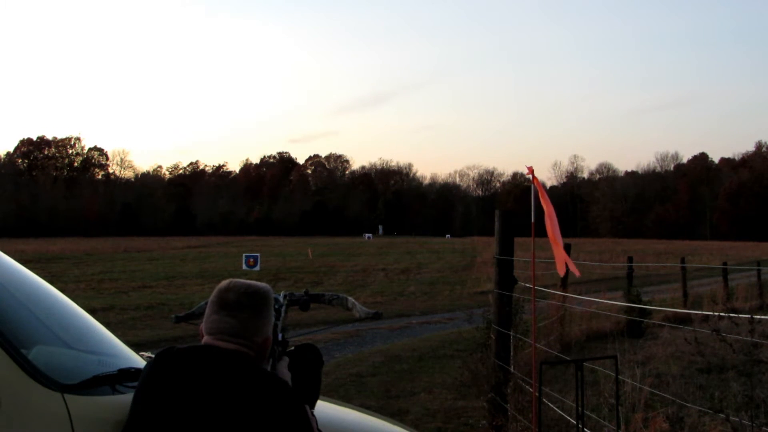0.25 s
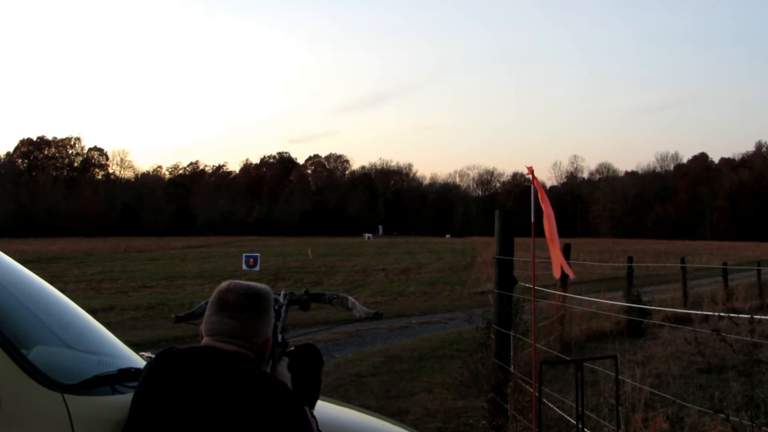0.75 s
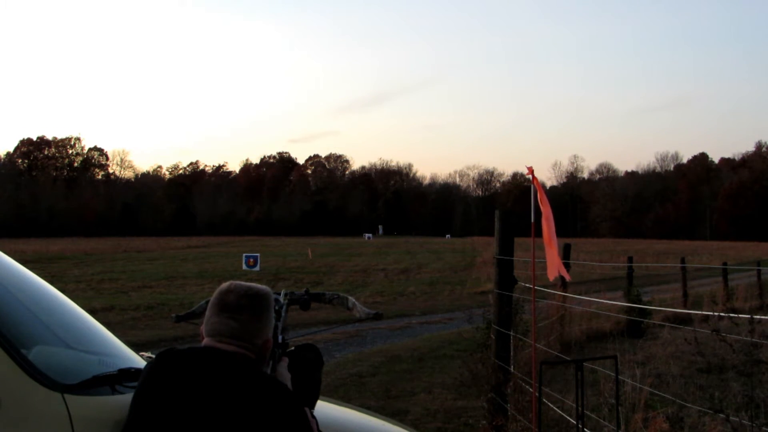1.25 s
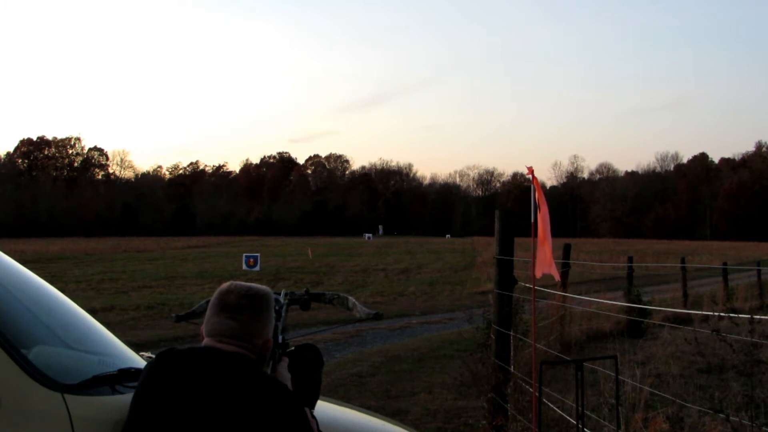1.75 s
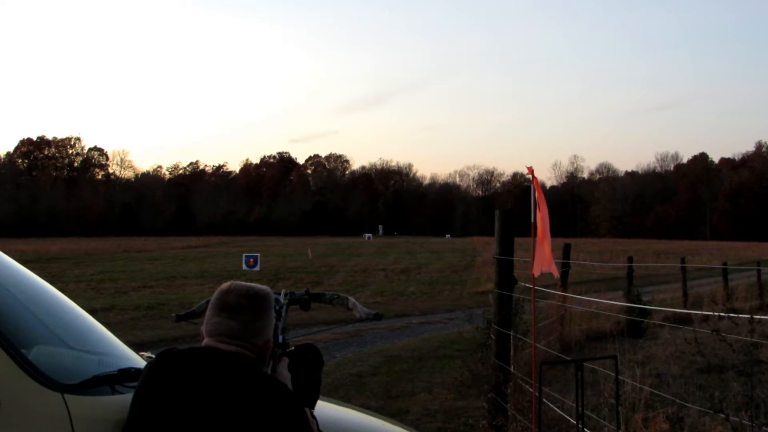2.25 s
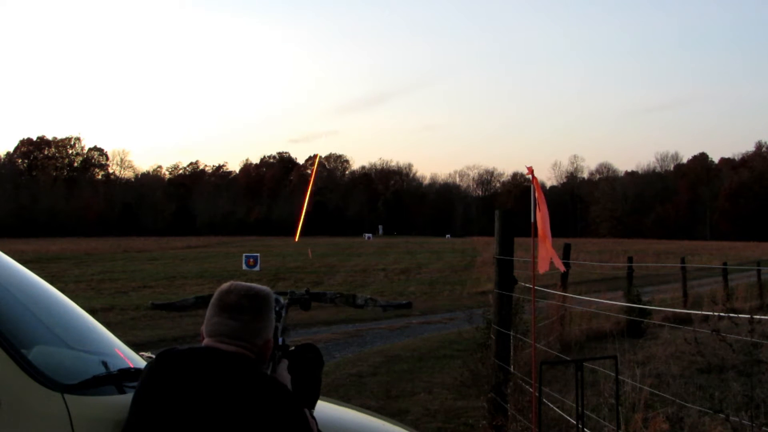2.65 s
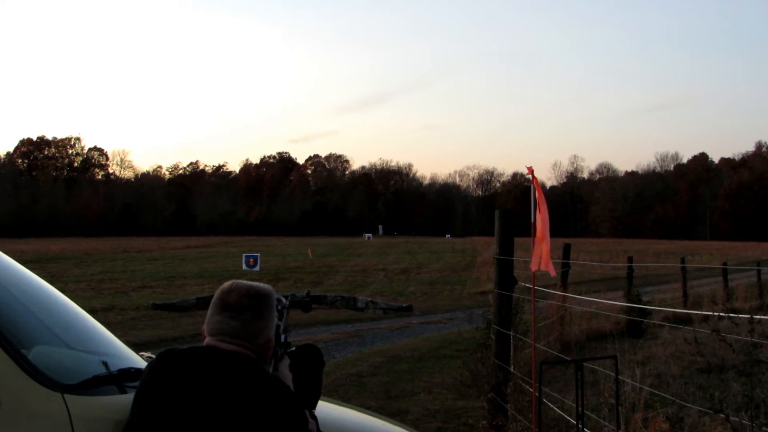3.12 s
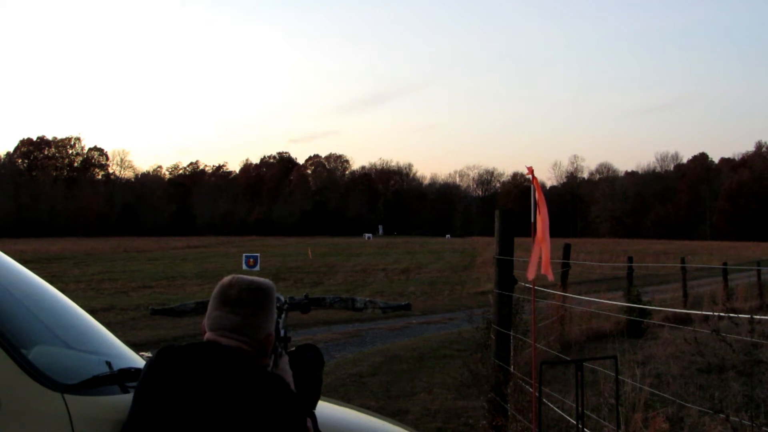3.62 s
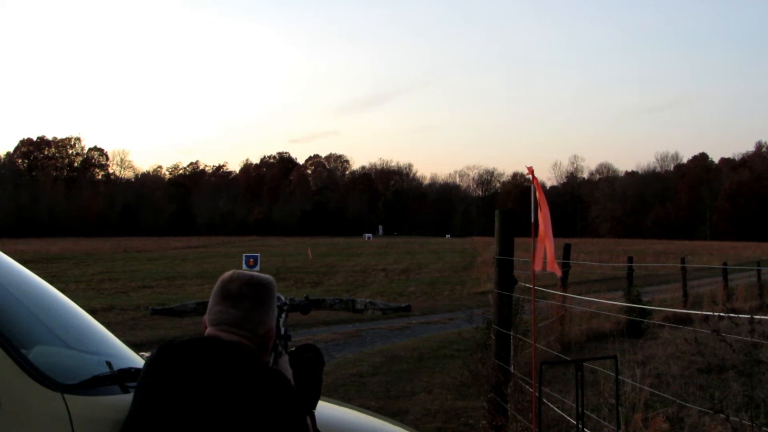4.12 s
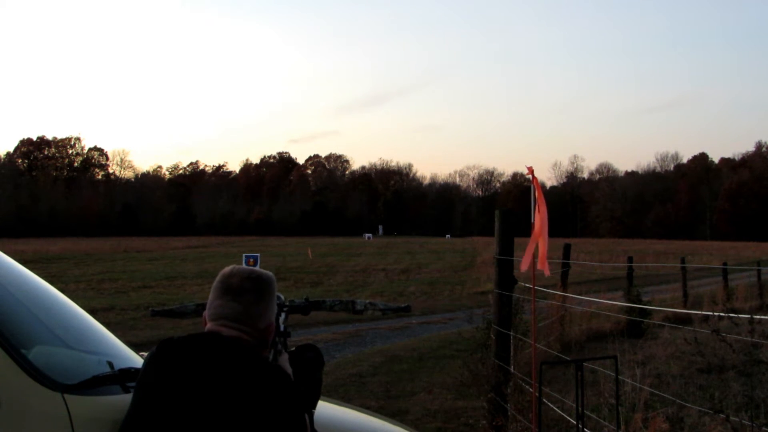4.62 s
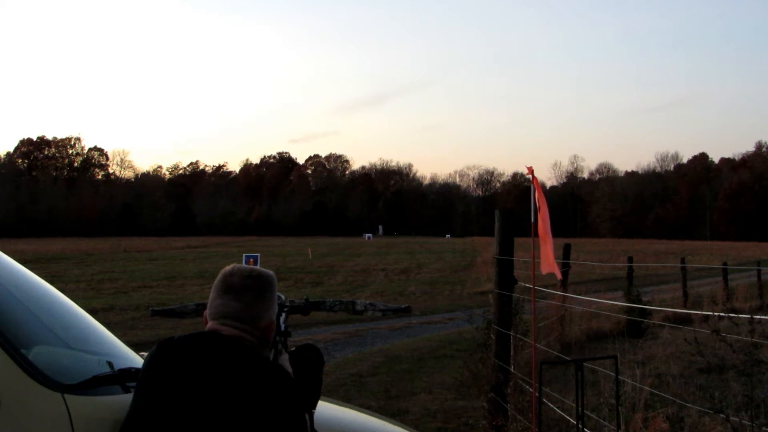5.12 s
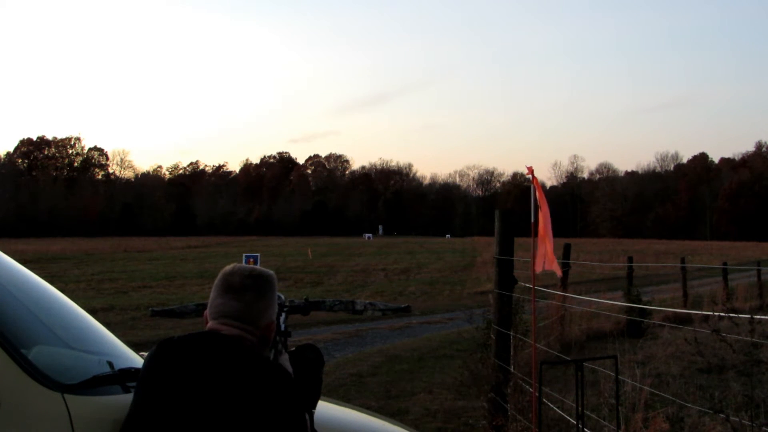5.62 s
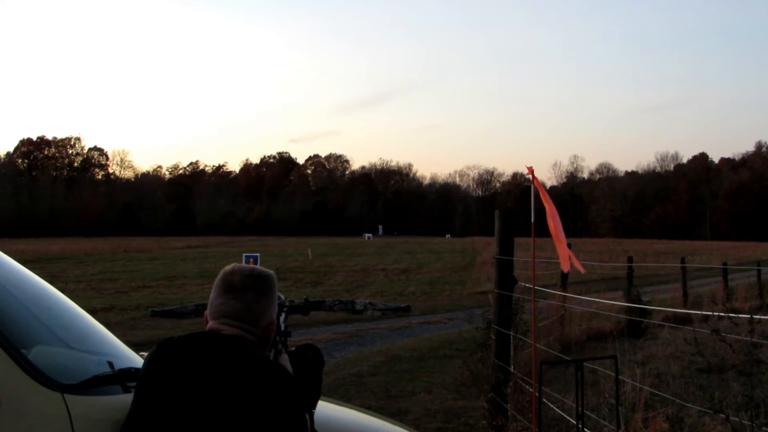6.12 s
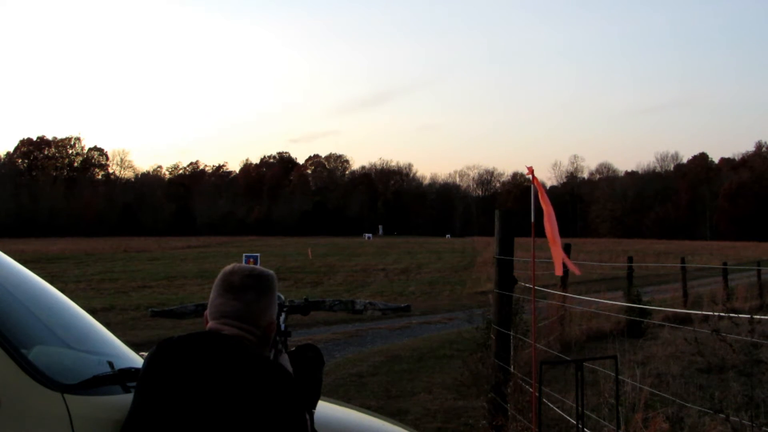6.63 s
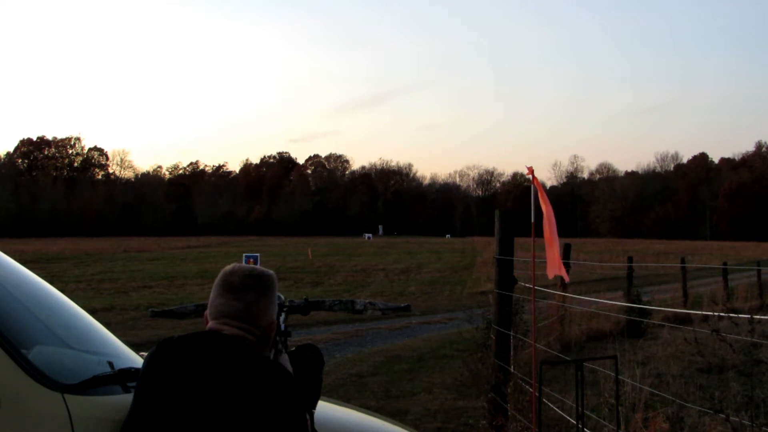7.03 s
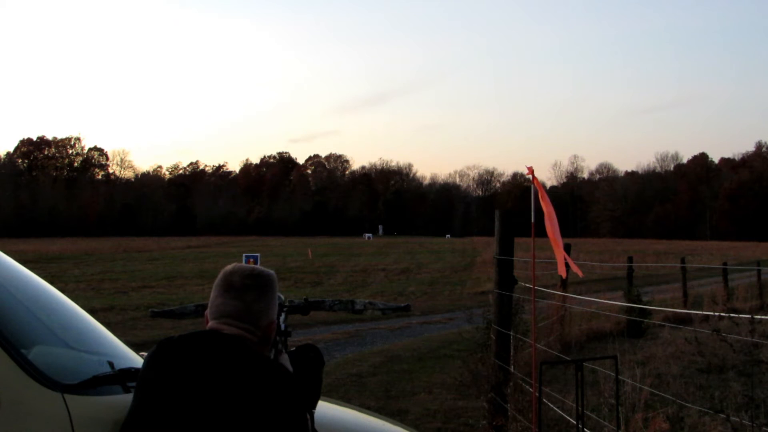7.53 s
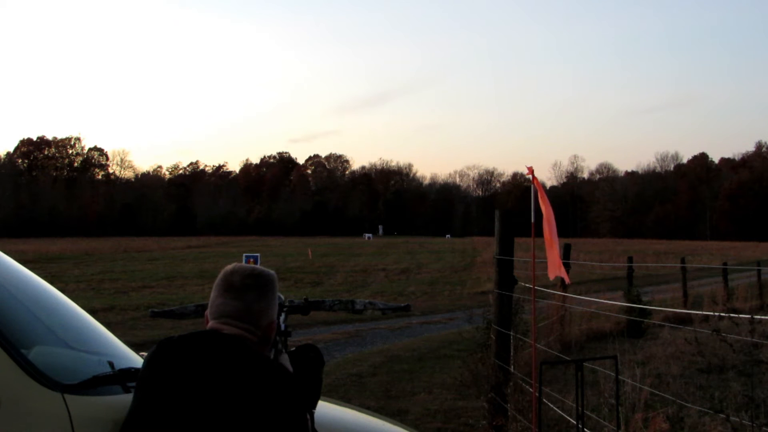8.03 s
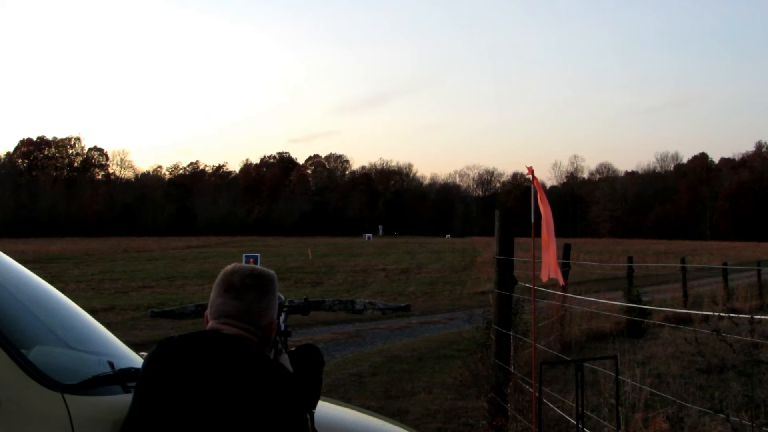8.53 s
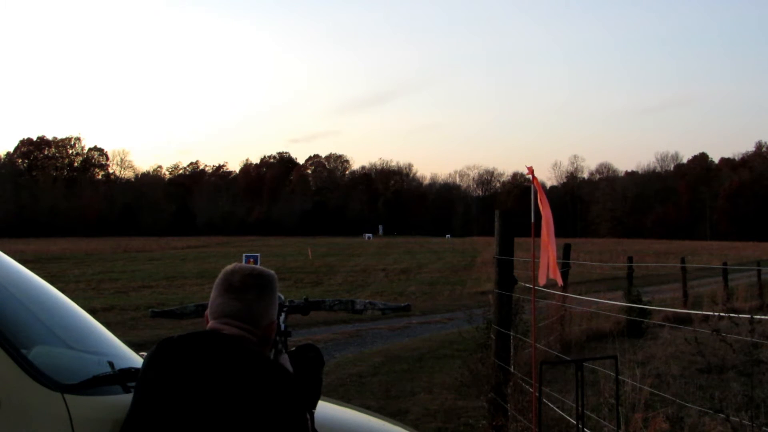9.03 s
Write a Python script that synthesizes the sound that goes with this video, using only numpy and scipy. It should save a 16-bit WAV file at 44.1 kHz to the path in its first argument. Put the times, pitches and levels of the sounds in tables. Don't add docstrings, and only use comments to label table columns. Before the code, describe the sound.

A quiet windy field with distant gunshots echoing off trees, then one very loud close crossbow snap, the background ducking and slowly returning with more far shots.

```python
import sys
import numpy as np
from scipy import signal
from scipy.fft import rfft, irfft
from scipy.io import wavfile
from scipy.ndimage import uniform_filter1d

SR = 44100
rng = np.random.default_rng(int(sys.argv[2]) if len(sys.argv) > 2 else 0)


def field_ratio(decibels):
    return 10 ** (np.asarray(decibels, dtype=float) / 20)


def to_wav(sig):
    pcm = np.clip(np.atleast_2d(sig), -1, 1) * 32767
    pcm = np.round(pcm).astype(np.int16)
    wavfile.write(sys.argv[1], SR, pcm.T)


N = 408366
POP_CENTRE_S = 6e-3
THUMP_S = .0098
OPPOSITE = np.array([[1], [-1]])


def unit(x):
    return x / np.sqrt(np.mean(x ** 2))


def colour(x, table):
    hz, db = np.transpose(table)
    bins_hz = np.arange(4097) * SR / 8192
    log_gain = np.log(field_ratio(np.interp(np.log(bins_hz + 1), np.log(hz), db)))
    cepstrum = irfft(log_gain)
    cepstrum[1:4096] *= 2
    cepstrum[4097:] = 0
    response = irfft(np.exp(rfft(cepstrum)))
    return signal.fftconvolve(x, response)[:len(x)]


def band(x, hz, width_hz):
    b, a = signal.iirpeak(hz, hz / width_hz, SR)
    return signal.lfilter(b, a, signal.lfilter(b, a, x))


def ring(x, modes):
    out = 0
    for hz, db, t60 in modes:
        pole = np.exp(2j * np.pi * hz / SR - np.log(1000) / (t60 * SR))
        out = out + field_ratio(db) * signal.lfilter([1], [1, -pole], x).imag
    return out


def walk(rate):
    hold = int(SR / rate)
    steps = np.repeat(rng.standard_normal(N // hold + 1), hold)
    smooth = uniform_filter1d(uniform_filter1d(steps, hold), hold)
    return unit(smooth[:N])


def add(out, s, sound):
    i = int(round(s * SR))
    out[:, i:i + sound.shape[1]] += sound[:, :out.shape[1] - i]


def air(table, level_db, gust_db):
    low = signal.butter(2, 330, fs=SR, output="sos")
    hiss = level_db_gain = field_ratio(level_db) * unit(colour(rng.standard_normal(N), table))
    wind = field_ratio(gust_db + 1.8 * walk(7.4) - 1.6)
    return hiss + (wind - 1) * signal.sosfiltfilt(low, hiss)


def whine():
    start_hz, drift_hz_per_s = 5707, 29
    hunt_hz, hunt_s, period_s, width_s = 68, .65, 1, .26
    t = np.arange(N) / SR
    from_hunt_s = np.abs((t - hunt_s + period_s / 2) % period_s - period_s / 2)
    hz = start_hz + drift_hz_per_s * t + hunt_hz * np.maximum(1 - from_hunt_s / width_s, 0)
    turn = 2 * np.pi * np.cumsum(uniform_filter1d(hz, 4000) + 6 * walk(25)) / SR
    return field_ratio(-68.5 + 1.1 * walk(12)) * (np.sin(turn) + field_ratio(-20.0) * np.sin(2 * turn))


def evening():
    # frequency in Hz, level in dB per Hz.
    air_mid = [(18, -51.5), (30, -15.5), (81, -8.5), (171, -17), (304, -20), (346, -16.5), (524, -5),
               (680, -11), (754, -6), (1270, -19), (5580, -24.5), (11900, -32.5), (15000, -46.5)]
    air_side = [(18, -30.5), (30, -13.5), (158, -6), (567, -5), (1030, -9), (1560, -14.5), (3500, -19.5),
                (3980, -23.5), (5170, -21), (11300, -30.5), (13500, -37.5), (15000, -52.5)]
    gust_db = 1.1 * walk(2.0)
    mid = air(air_mid, -50.5, gust_db)
    side = air(air_side, -48.5, gust_db)
    return mid + whine() + side * OPPOSITE


def drone():
    # time in seconds, level in dB.
    engine = [(0, -67), (.35, -52), (.7, -56.5), (1.5, -58), (2.5, -78)]
    hum = unit(band(rng.standard_normal(N), 530, 60))
    return hum * field_ratio(np.interp(np.arange(N) / SR, *np.transpose(engine)))


def pop(db, hz, cycles, pan_db, phase, glide=0.):
    t = np.arange(-POP_CENTRE_S, 9e-3, 1 / SR)
    turns = hz * t
    steep = np.where(turns < 0, 3.2, 1.8)
    swell = np.exp(-(steep * turns / cycles) ** 2)
    wave = swell * np.cos(2 * np.pi * (turns - glide * turns ** 2) + phase)
    return wave * field_ratio(db + np.array([[pan_db], [-pan_db]]) / 2)


def woods(spread):
    # seconds after the shot, level in dB,
    # rise in seconds, depth in seconds, seconds to fall 60 dB.
    stands = [(.006, -31.5, 0.0047, 0, 0.054), (0.033, -29.5, 0.046, 0, 0.13),
              (0.08, -31.5, 0.014, 0.011, 0.066), (0.108, -28, 0.0065, 0.042, 0.67),
              (.24, -30, 0.072, 0.069, 0.34), (.36, -38, .05, 0.013, 1.6), (.6, -44.5, 0.73, 0, 6)]
    # centre in Hz, width in Hz.
    bands = [(620, 588), (1050, 696), (2400, 2400)]
    t = np.arange(int(2.6 * SR)) / SR
    power = 0
    for s, db, rise, depth, t60 in stands:
        fall = field_ratio(db - 60 * np.maximum(t - s - depth, 0) / t60)
        power = power + fall ** 2 * np.clip(1 + (t - s) / rise, 0, 1) ** 4
    gain = np.sqrt(power) * np.clip((2.6 - t) / .5, 0, 1)
    tilts_db = -6.5 + 6 * t, 0, -30.5 - 19 * np.log10(t + 0.06)
    per_s = 1800 + 4000 * t
    trunks = rng.standard_normal((2, len(t))) * (rng.random((2, len(t))) < per_s / SR)
    trunks = trunks / np.sqrt(per_s)
    out = 0
    for k, ((hz, width_hz), db) in enumerate(zip(bands, tilts_db)):
        mid, side = ((-1) ** k * unit(band(clicks, hz, width_hz)) for clicks in trunks)
        out = out + gain * field_ratio(db) * (mid * field_ratio([[-.6], [.6]]) + spread * side * OPPOSITE)
    return out


def echoes():
    # seconds after the shot, level in dB.
    near = [(.0306, -30), (.0413, -32), (.0802, -32), (.0862, -32), (.1085, -27), (.1188, -27),
            (.1288, -24), (.1357, -25), (.1438, -30), (.1531, -27), (.1613, -30), (.1709, -30),
            (.1786, -25), (.1887, -27), (.1972, -29), (.221, -27), (.2297, -28), (.2383, -28), (.2506, -27),
            (.2573, -27), (.2683, -26), (.2739, -25), (.2894, -26), (.3021, -26), (.3123, -28),
            (.3201, -30), (.3396, -28)]
    near_s, near_db = np.transpose(near)
    far = np.arange(16)
    chance = rng.standard_normal((len(near) + len(far), 4)).T
    far_s = .02 * (far + 0.1926 * chance[3, len(near):])
    s = np.r_[near_s, .363 + far_s]
    db = np.r_[near_db, -30.5 - 24 * far_s]
    hz = 1043 - 164 * s + 140 * chance[0]
    pan_db = -1.5 * chance[1]
    return zip(s, db, hz, pan_db, 2 * np.pi * chance[2])


def ground_click():
    click = np.zeros(SR // 10)
    click[int(THUMP_S * SR)] = 1
    return click


def direct_report():
    # seconds after the shot, level in dB, centre in Hz, left minus right in dB.
    direct = (.0028, -22, 1230, -1.5)
    s, db, hz, pan_db = direct
    blast, crack = np.zeros((2, 2, SR // 10))
    add(blast, s - .0005, pop(db + 6.5, 1.12 * hz, 2.6, pan_db, 1.6, glide=.07))
    add(crack, s - .0005, pop(db, 2.25 * hz, 2.2, pan_db, .4))
    add(blast, s + .0057, pop(db - 3, 1.15 * hz, 3.4, pan_db, .3))
    click = ground_click()
    swell = np.minimum(np.cumsum(np.cumsum(click)) / 90, 1)
    blast += ring(click, [(112, -29, .05), (340, -39, .05)]) * swell
    return blast, crack


def echo_roll():
    roll = np.zeros((2, 3 * SR))
    scatter = .9 * woods(.1)
    t = np.arange(scatter.shape[1]) / SR
    for s, db, hz, pan_db, phase in echoes():
        add(roll, s, pop(db + 3.5, hz, 3.1, pan_db, phase))
        scatter = scatter * (1 - .85 * np.exp(-((t - s) / .0035) ** 2))
    add(roll, POP_CENTRE_S, scatter)
    add(roll, .27, ring(ground_click(), [(106, -42.0, 0.069)]) * [[1], [1]])
    return roll


def gunfire():
    # start in seconds, blast in dB, echoes in dB, extra lag of the echoes in ms,
    # bright crack in dB.
    shots = [
        (.713, -1, -3, 0, -4),
        (1.477, -2.5, -3, 0.092, -5.5),
        (3.0491, 0.5, -3.5, 1.59, -4),
        (4.4125, -1, -3.5, 1.47, -6.5),
        (6.2234, -1, -3, 0.15, -18),
        (7.2483, -2.5, -2, 0.23, -11.5),
    ]
    # time in seconds, level in dB, centre in Hz, cycles, left minus right in dB.
    pops = [
        (3.0, -39, 750, 7, 0),
        (3.0785, -26, 1050, 5, -1),
        (3.127, -30, 1400, 6, -1),
        (3.153, -29, 1550, 3.5, -1),
        (4.4435, -25, 1150, 3, -1),
        (4.489, -31, 1350, 4, -1),
        (7.3205, -23, 1330, 3.6, -1),
        (7.3203, -37, 2600, 3, -1),
        (8.0665, -27, 900, 2.4, -1),
        (8.0668, -26, 2050, 4.5, -1),
    ]
    out = np.zeros((2, N))
    roll = echo_roll()
    blast, crack = direct_report()
    for s, blast_db, echo_db, lag_ms, crack_db in shots:
        add(out, s - POP_CENTRE_S, field_ratio(blast_db) * blast + field_ratio(crack_db) * crack)
        add(out, s - POP_CENTRE_S + lag_ms / 1000, field_ratio(echo_db) * roll)
        add(out, s, field_ratio(echo_db) * .35 * woods(.2))
    for s, db, hz, cycles, pan_db in pops:
        add(out, s - POP_CENTRE_S, pop(db, hz, cycles, pan_db, 2.5))
    return out


def far_guns():
    guns = signal.sosfilt(signal.butter(6, 4200, fs=SR, output="sos"), gunfire())
    guns[0] = np.roll(guns[0], 3)
    return guns


def rattle(rows, spread):
    # frequency in Hz, level in dB per Hz.
    body = [(35, -48.5), (60, -13), (302, -9.5), (734, -4.5), (927, -13), (2150, -1.5), (2420, -8),
            (3360, -3), (3950, -5), (4450, -7.5), (6620, -12.5), (11900, -17.5), (16100, -30.5)]
    out = np.zeros((2, N))
    t = np.arange(SR // 2) / SR
    for s, db, rise_ms, t60, zing_db in rows:
        shape = (1 - np.exp(-1000 * t / rise_ms)) * field_ratio(-60 * t / t60)
        mid, side = (unit(colour(rng.standard_normal(len(t)), body)) for _ in range(2))
        zing, wide = (unit(band(rng.standard_normal(len(t)), 12300, 3500)) for _ in range(2))
        zing = zing + .22 * wide * OPPOSITE
        add(out, s, field_ratio(db) * shape * (mid + field_ratio(zing_db) * zing + spread * side * OPPOSITE))
    return out


def bow_ringing():
    # frequency in Hz, level in dB, seconds to fall 60 dB.
    limbs = [(199, -25, 0.41), (226, -20, .5), (402, -12, 0.53), (650, -12, 0.11), (1310, -8, 0.17),
             (2290, -14, 0.33), (2600, -11, 0.21), (3240, -8.5, .11), (4370, -16, .2), (4550, -19.5, 0.24),
             (5680, -16, 0.29), (7840, -22.5, .2)]
    stock = [(312, 11, 0.081), (118.5, 10, 0.037), (750, -8.5, 0.055)]
    cables = [(220, -40, .6), (2144, -29, .42), (2153, -34, .42), (3243, -33, .42), (3260, -36, .42)]
    strikes, stop = np.zeros((2, N))
    for s, db in ((2.7402, -6.5), (2.7456, -11), (2.7508, -17.5)):
        strikes[int(s * SR)] = field_ratio(db)
    stop[int(2.7456 * SR)] = 1
    return field_ratio(-16.0) * ring(strikes, limbs) + field_ratio(-21) * ring(strikes, stock) + ring(stop, cables)


def crossbow():
    # start in seconds, level in dB, rise in ms, seconds to fall 60 dB, zing in dB.
    blows = [
        (2.7382, -9.5, 0.49, 0.018, -9),
        (2.7402, 0.5, 0.24, 0.013, -15.5),
        (2.7451, -1.5, 0.15, 0.013, -4),
        (2.7504, -9.5, 0.27, 0.018, -2),
        (2.7535, -15.5, 0.48, .04, -11),
        (2.7567, -15.5, .6, .04, -17.5),
        (2.7605, -16.5, .6, 0.064, -10),
        (2.775, -26, 3.3, 0.14, -18.5),
    ]
    returns = [
        (2.818, -27.5, 5.6, .3, -22),
        (2.855, -44, 8, 0.23, -24),
        (2.91, -43, 10, 0.79, -30),
    ]
    bow = rattle(blows, .2) + bow_ringing() + rattle(returns, 0.54)
    return signal.sosfilt(signal.butter(2, 55, "high", fs=SR, output="sos"), bow)


def scene():
    return evening() + drone() + far_guns() + crossbow()


def limiter(x):
    wait_s, attack_s, hold_s, release_s = 0.0097, .09, 0.28, 0.51
    first_loud = np.argmax(np.abs(x).max(axis=0) > .45)
    t = (np.arange(N) - first_loud) / SR - wait_s
    letting_go = np.exp(-np.maximum(t - attack_s - hold_s, 0) / release_s)
    duck = np.clip(t / attack_s, 0, 1) * letting_go
    return np.clip(x * field_ratio(0.55 - 16.5 * duck), -1, 1)


def band_limit(x):
    return signal.sosfilt(signal.butter(12, 16250, fs=SR, output="sos"), x)


def record(dry):
    # centre in Hz, width in Hz.
    notches = [(3935, 260), (7870, 170)]
    x = signal.sosfilt(signal.butter(8, 15200, fs=SR, output="sos"), dry) * field_ratio([[-.1], [.1]])
    for hz, width_hz in notches:
        x = signal.lfilter(*signal.iirnotch(hz, hz / width_hz, SR), x)
    return band_limit(limiter(x))


dry = scene()
out = record(dry)
to_wav(out)
```